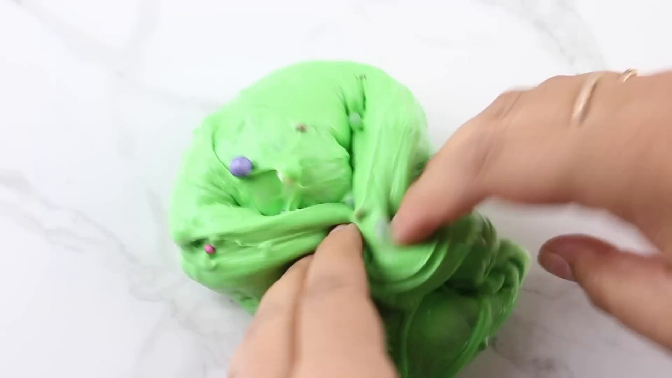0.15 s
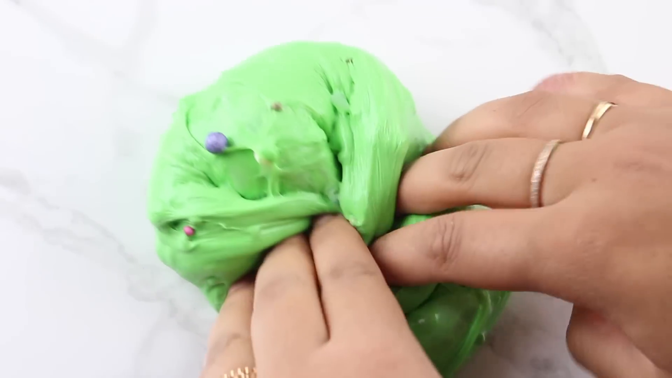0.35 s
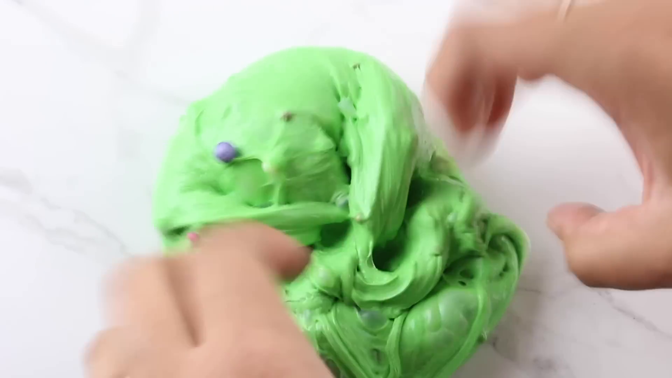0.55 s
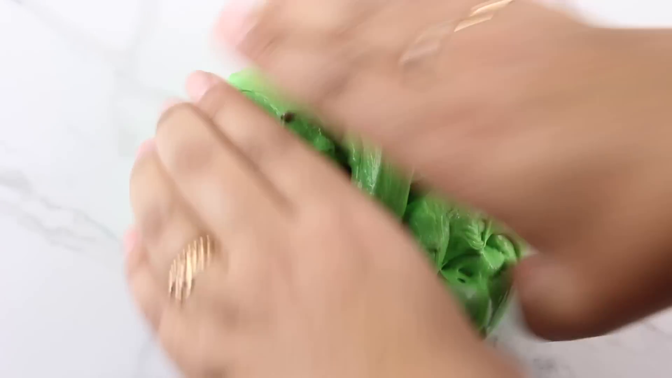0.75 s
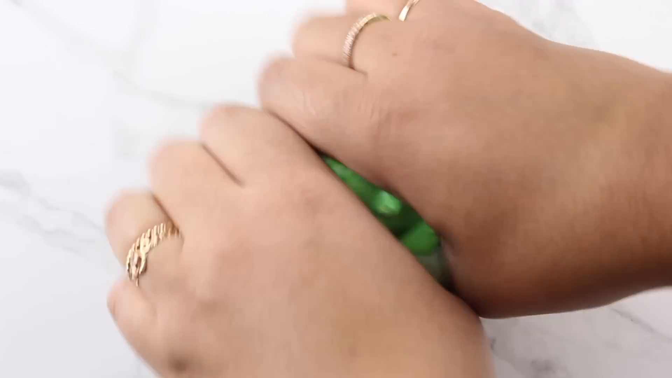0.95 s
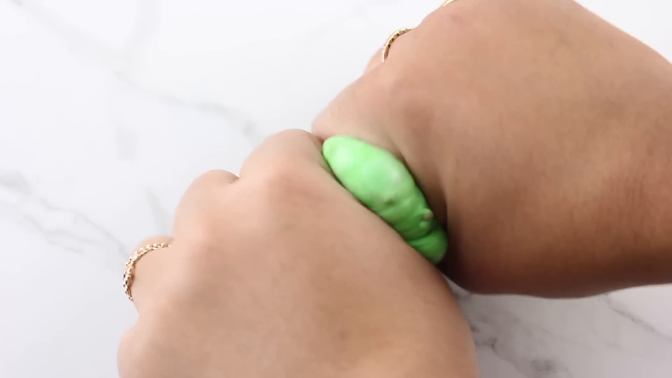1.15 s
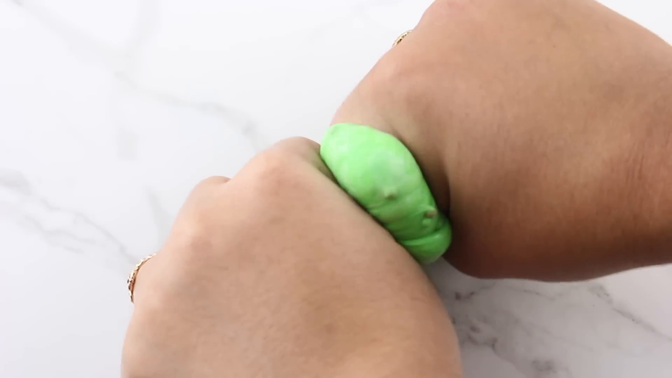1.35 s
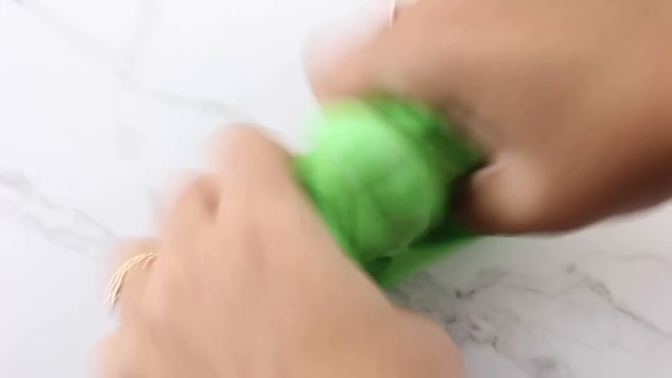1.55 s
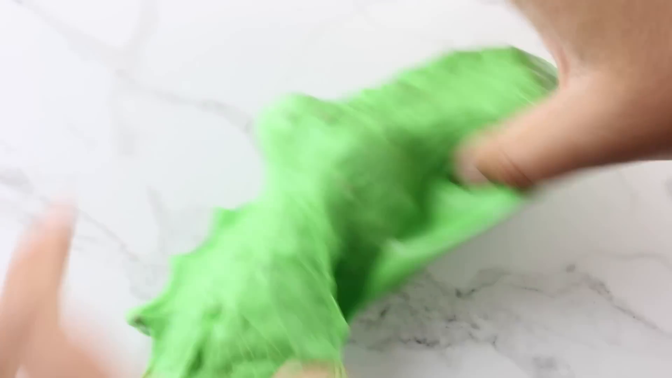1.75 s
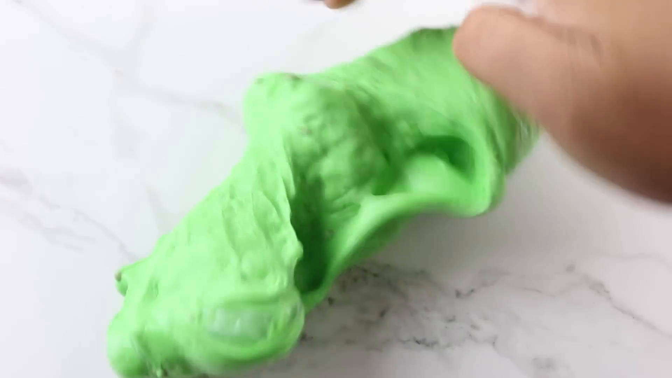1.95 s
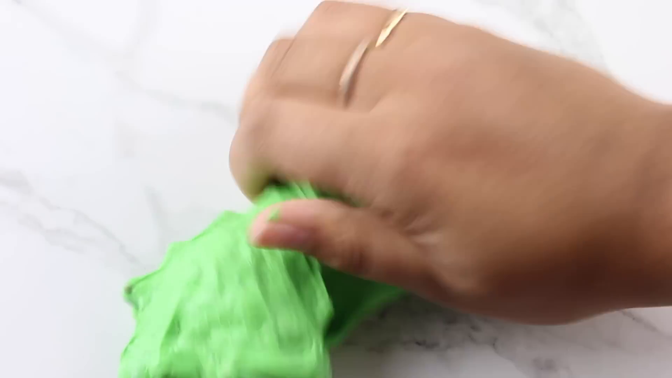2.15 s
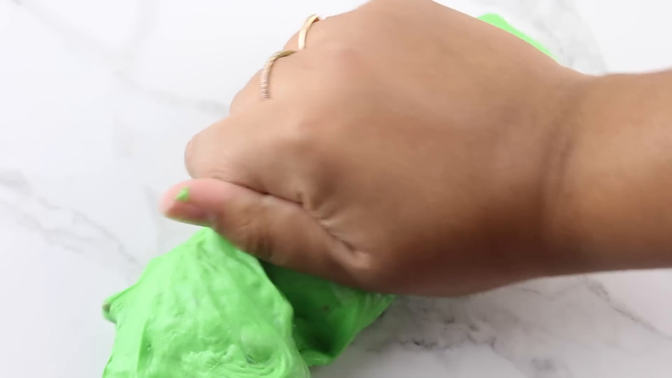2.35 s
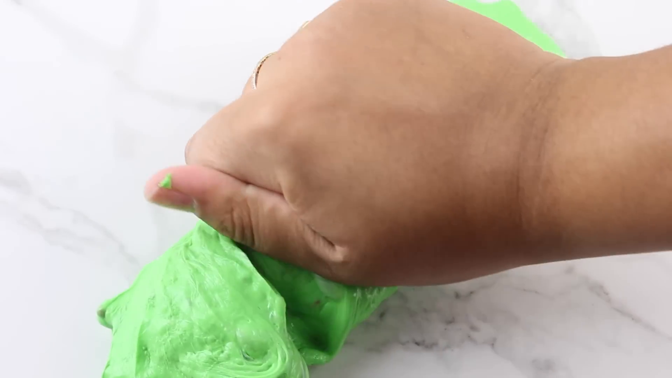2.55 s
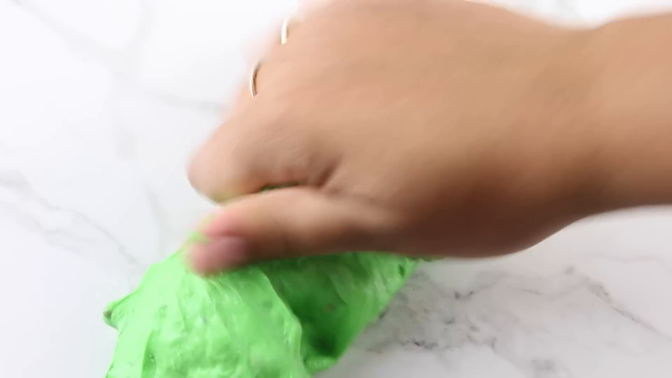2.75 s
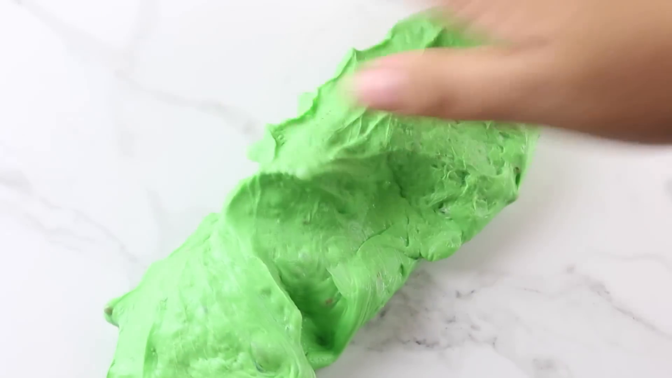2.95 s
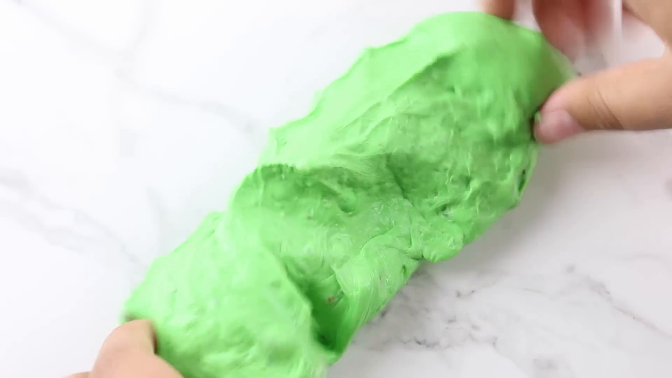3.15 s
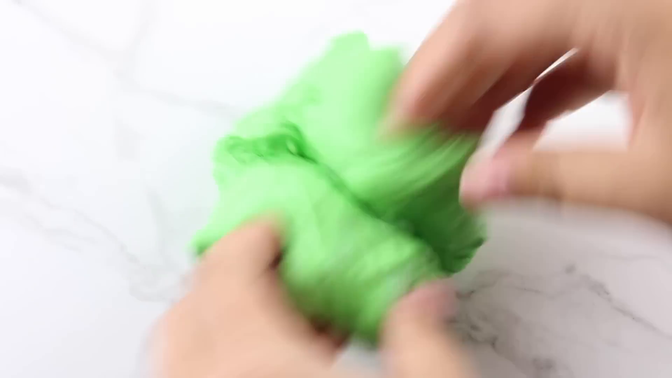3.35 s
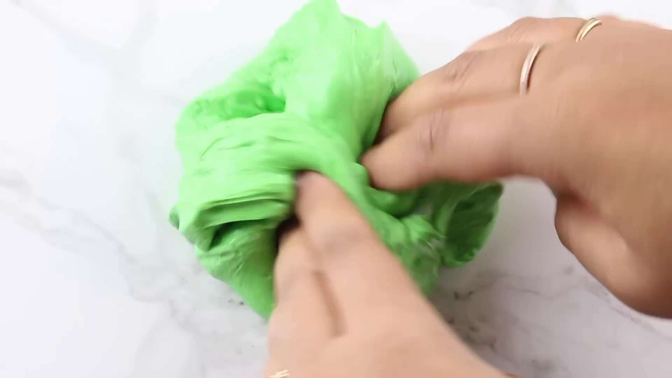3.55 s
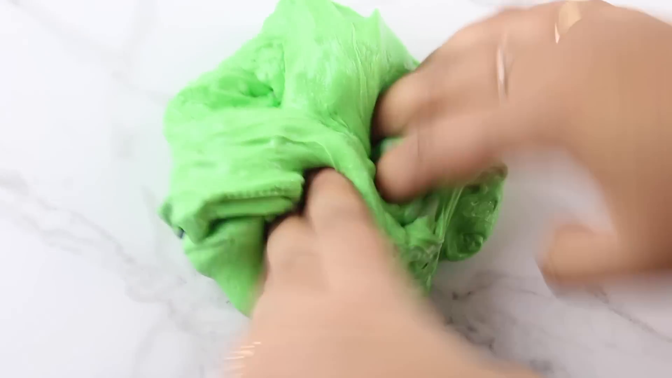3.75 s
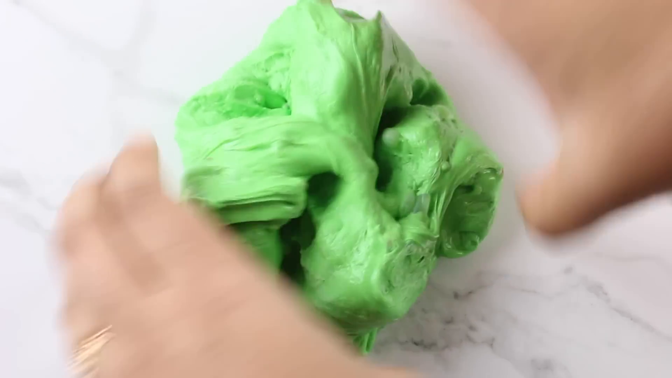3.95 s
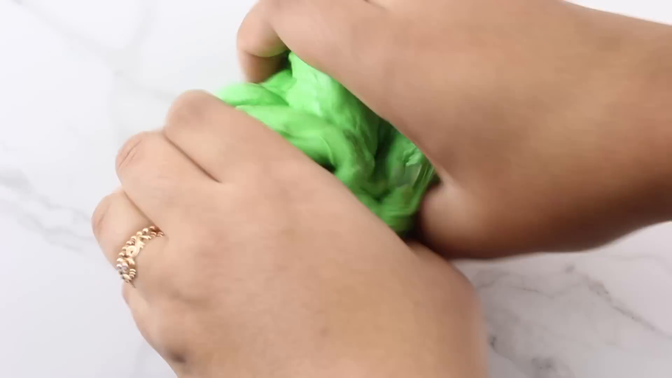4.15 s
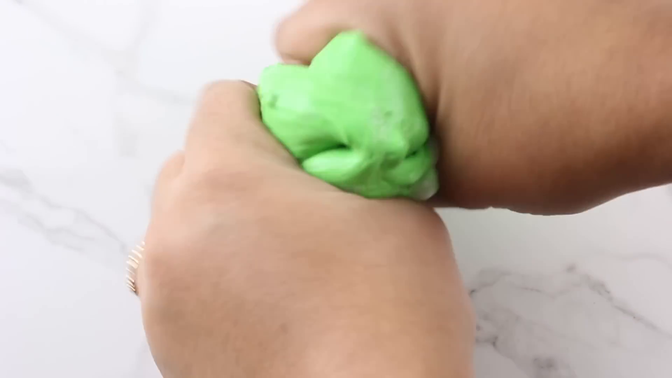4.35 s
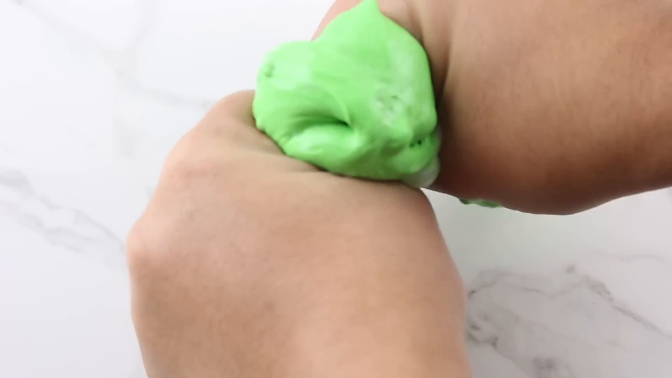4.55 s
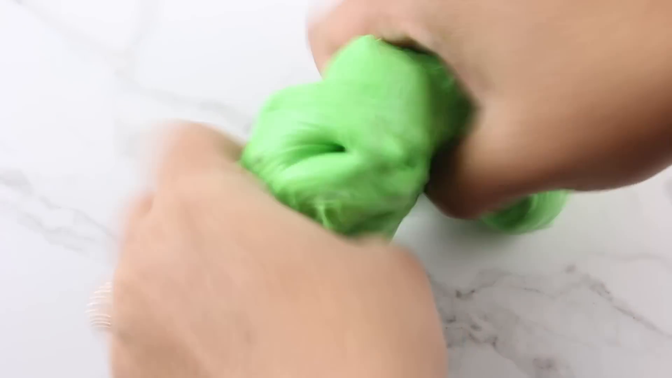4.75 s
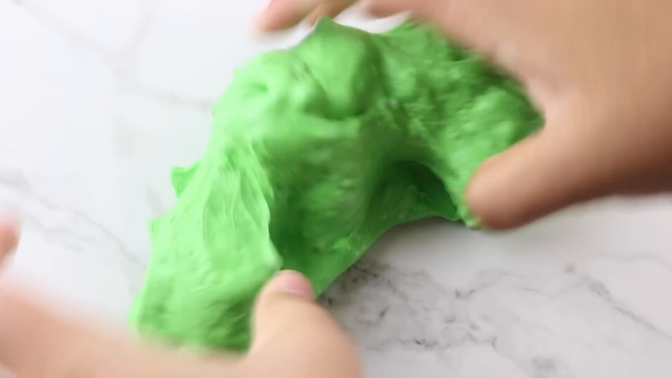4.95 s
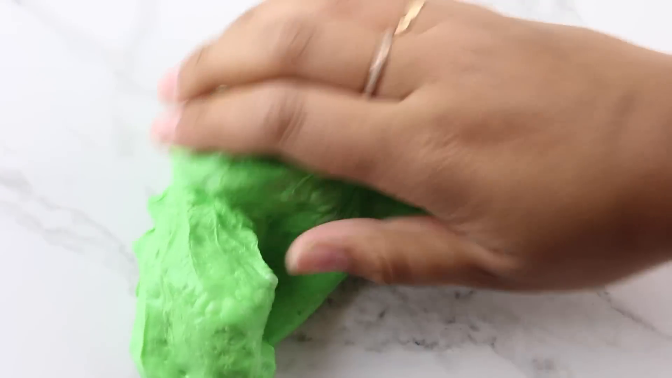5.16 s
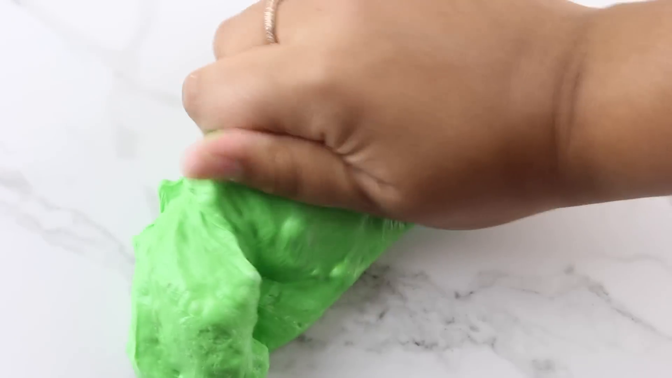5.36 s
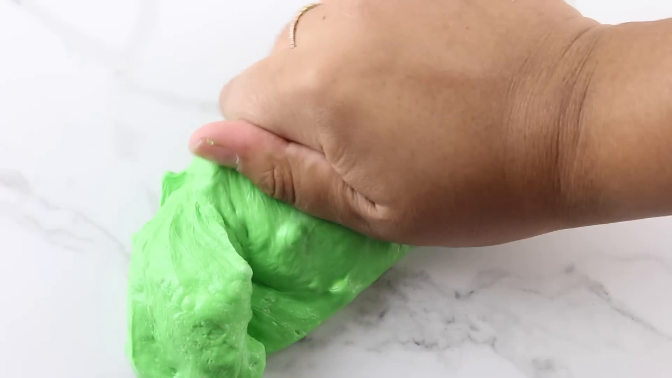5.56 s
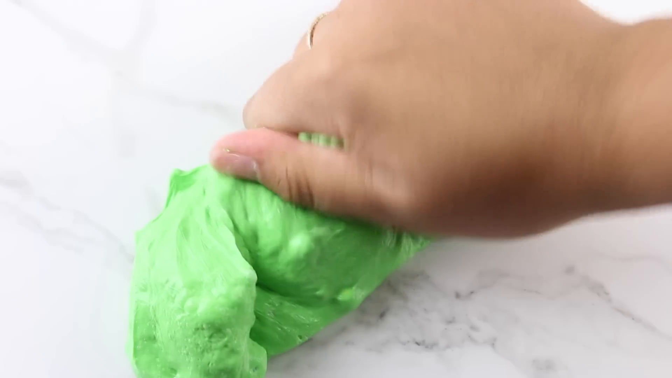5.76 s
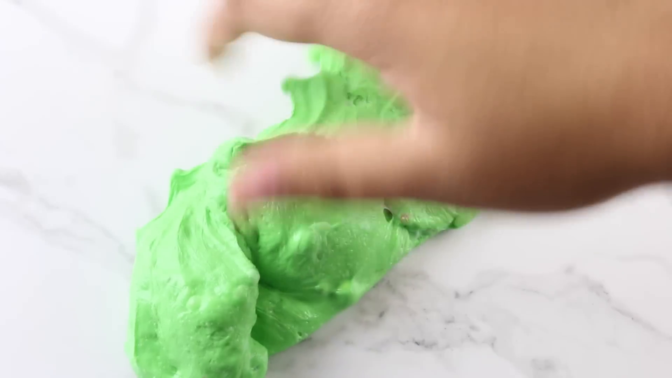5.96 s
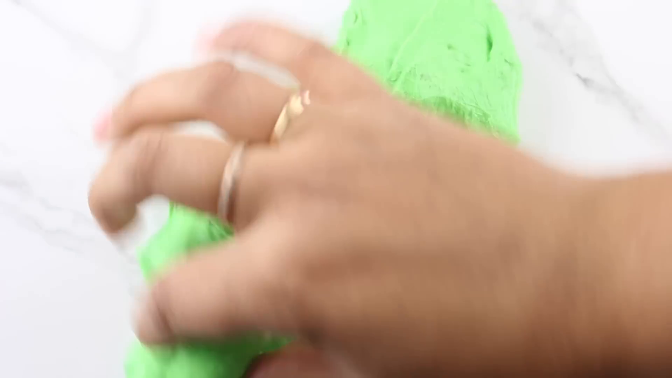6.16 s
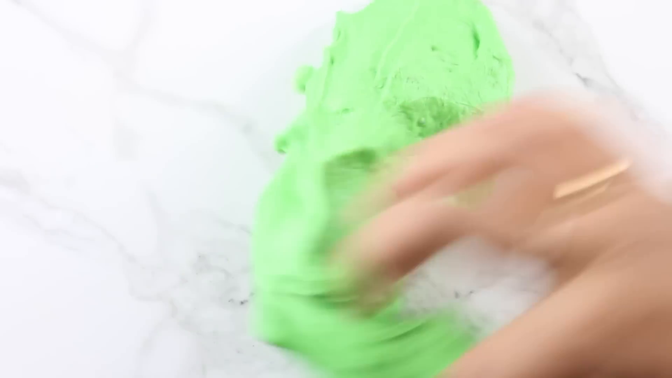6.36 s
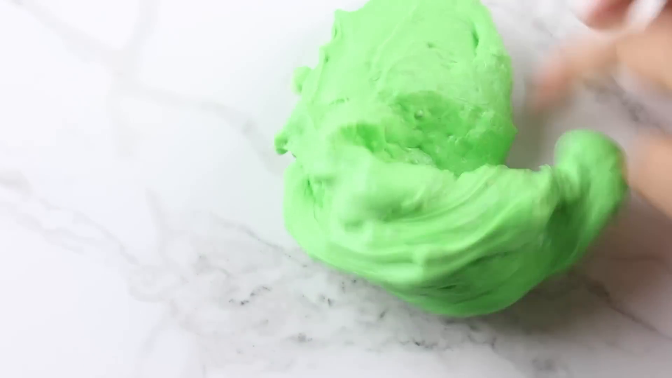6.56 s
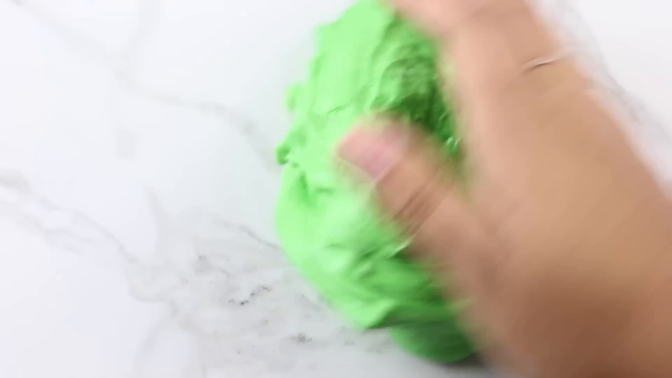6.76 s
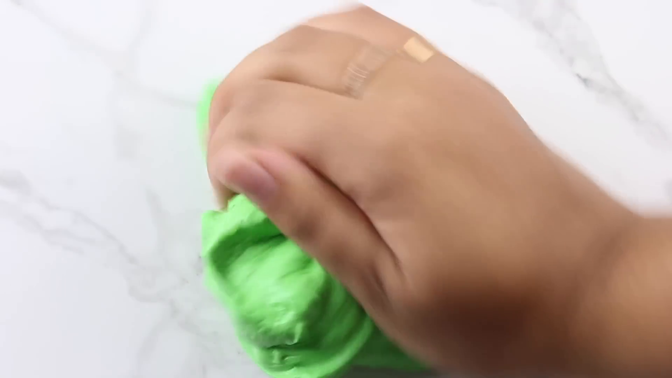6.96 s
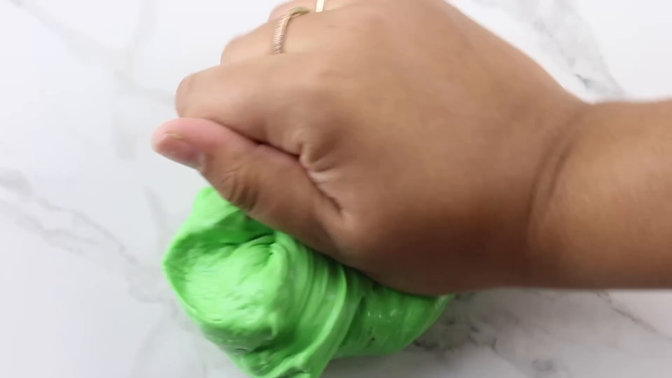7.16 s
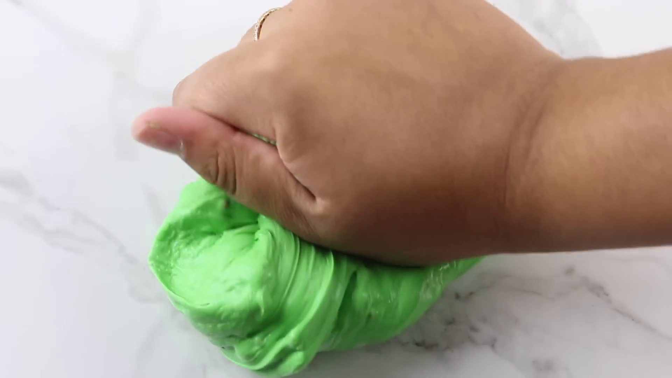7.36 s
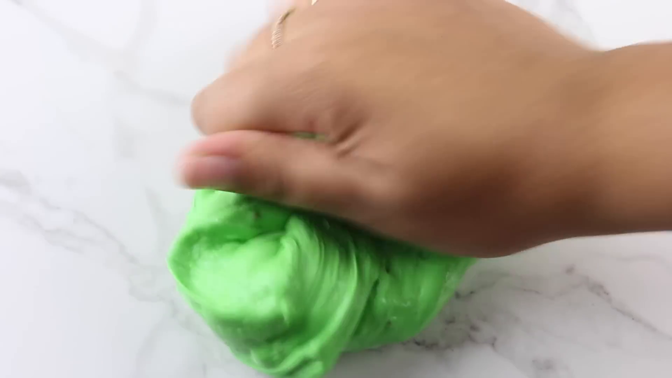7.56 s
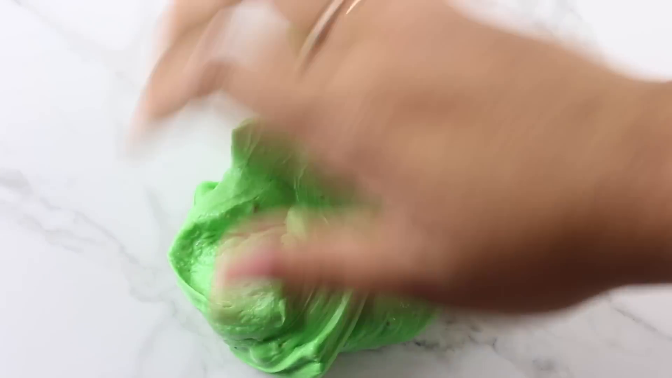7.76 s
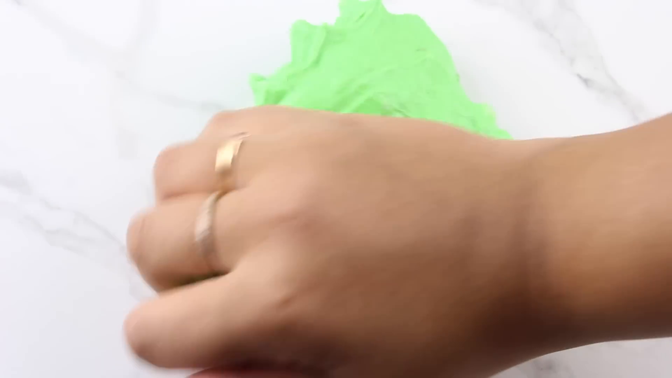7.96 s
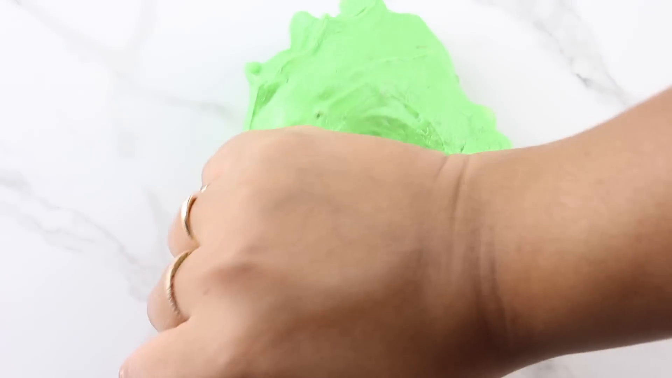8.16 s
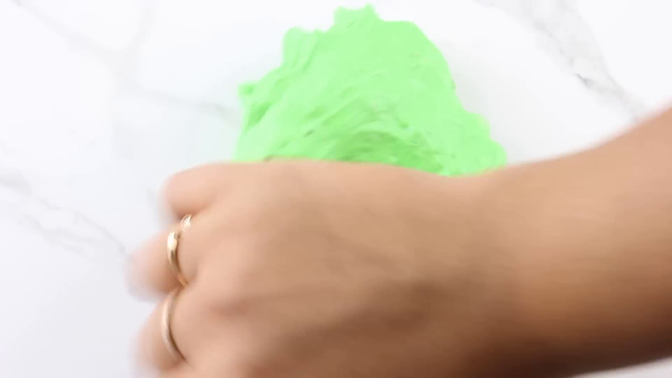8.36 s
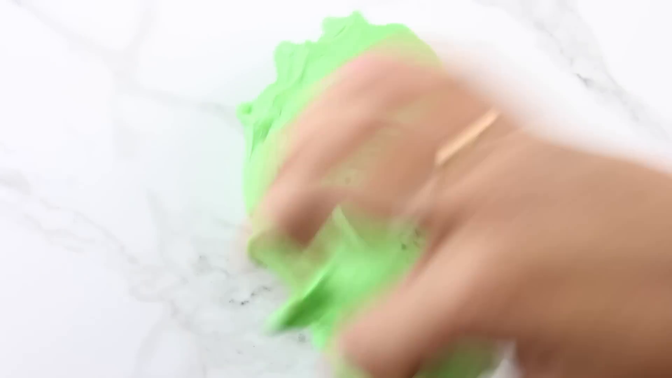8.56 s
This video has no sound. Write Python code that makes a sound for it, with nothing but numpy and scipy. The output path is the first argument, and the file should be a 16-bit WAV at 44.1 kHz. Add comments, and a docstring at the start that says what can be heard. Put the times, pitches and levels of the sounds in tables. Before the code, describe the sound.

Close, dry and bright: sticky slime is pressed until trapped bubbles snap in fast irregular clusters, some almost painfully loud. Each cluster ends in fine wet crackle, then hands lift with a fizzy peel and low squish. Calmer folding brings small ticks, plops and dull thuds on stone. The loudest volleys come early and mid-way, with lesser ones near the end, in a small quiet room.

```python
"""Air pockets trapped in a lump of sticky slime burst in sharp pops, each a skin snap and a briefly ringing cavity;
the biggest overload the recorder. Two hands fold and squeeze the lump on a stone counter, close to a microphone:
swarms of tiny cavities crackle and squish, deep folds plop, an unsteady sine squeaks out of a fold, and
low noise bursts bump the counter softly. A small quiet room adds dense echoes and filtered-noise room tone."""
import sys
import numpy as np
from scipy import signal
from scipy.io import wavfile
from scipy.ndimage import uniform_filter1d

SR = 44100
rng = np.random.default_rng(int(sys.argv[2]) if len(sys.argv) > 2 else 0)


def output_pcm(signal):
    """Save a mono or channel-first signal as 16-bit PCM at the path in sys.argv[1].

    Samples are clipped to [-1, 1] before scaling.
    """
    pcm = np.clip(np.atleast_2d(signal).T, -1, 1) * 32767
    wavfile.write(sys.argv[1], SR, np.round(pcm).astype(np.int16))


N = 379701
TIME = np.arange(N) / SR

# the air pockets that burst loudest, levels ahead of colouring and overload:
# (time [s], level [dB], cavity pitch [Hz], cavity Q [-])
AIR_POCKETS = [(0.13, -40, 4000, 2.5), (0.1703, -38, 6600, 0.72), (0.1984, -43.5, 8980, 1.6),
               (0.2365, -35, 7500, 0.6), (0.324, -33, 8000, 1.6), (0.3944, -27, 7260, 5),
               (0.4, -22.5, 3900, 1.5), (0.6053, -27.5, 3420, 0.6), (0.613, -32, 4480, 0.54),
               (0.948, -34, 3350, 1.8), (0.954, -31, 11000, 0.77), (1.0364, -29, 4230, 3),
               (1.0419, -18.5, 3800, 1.8), (1.0891, -15, 2800, 2.3), (1.1072, -8.5, 3700, 0.88),
               (1.1105, -11.5, 3900, 3), (1.1157, -3, 3040, 3.2), (1.1513, -12, 2660, 1.5),
               (1.19, -26, 3530, 0.56), (1.2467, -28, 3570, 0.43), (1.3, -9, 4400, 1.3),
               (1.3437, -23, 4800, 0.39), (1.3743, -13.5, 3760, 3.2), (1.3795, -2.5, 8800, 1.4),
               (1.383, -8.5, 8600, 2.6), (1.421, 0.5, 5930, 0.56), (1.428, -7, 12900, 4),
               (1.471, -24, 4200, 1.3), (2.252, -39, 3550, 0.85), (2.3311, -28, 3220, 3),
               (2.3626, -33, 3350, 2), (2.405, -29, 3700, 0.74), (2.464, -26, 12000, 1.2),
               (2.4897, -27, 7000, 1.2), (2.5228, 1, 5300, 2.6), (2.5256, -12, 5660, 3.4),
               (2.5527, -11, 3740, 0.96), (2.561, 1.5, 3830, 1.08), (2.575, -8.5, 11000, 1.6),
               (2.5884, -4.5, 1740, 1.1), (2.6083, -3.5, 3055, 1.2), (2.6637, -7, 9100, 1.25),
               (2.6819, -8.5, 3030, 1.25), (2.7246, -21.5, 11000, 1.1), (2.8898, -31.5, 5000, 1),
               (3.1353, -44, 1600, 1.7), (3.332, -42.5, 6500, 0.8), (3.4271, -35.5, 5540, 0.42),
               (3.4573, -35.5, 3180, 3), (3.504, -29, 6500, 1.8), (3.554, -22.5, 3630, 2.1),
               (3.6081, -28.5, 6440, 0.6), (3.691, -25.5, 2850, 0.94), (3.7276, -15, 3920, 2.8),
               (3.9218, -29.5, 2220, 0.56), (4.2568, -37, 3760, 1.5), (4.2727, -32.5, 8980, 2.2),
               (4.2964, -32.5, 4500, 1.2), (4.328, -31, 3000, 1), (4.396, -35, 7950, 0.7),
               (4.4089, -21.5, 1820, 0.65), (4.4229, -23.5, 7550, 2.2), (4.5293, -28, 7700, 1.4),
               (4.5338, -13, 7900, 1.4), (4.5907, 5, 6100, 1.83), (4.5976, -2, 6520, 4.6),
               (4.604, -6.5, 5630, 4.3), (4.6614, -7, 10300, 2.6), (4.6729, -4.5, 8600, 3.1),
               (5.3688, -31, 3900, 1.2), (5.3934, -31, 3760, 0.86), (5.4308, -18.5, 4000, 1.1),
               (5.5339, -21.5, 6200, 0.53), (5.5524, -26.5, 7460, 0.9), (5.5789, -10.5, 4000, 2.8),
               (5.6027, -22, 9700, 3), (5.6968, -22.5, 4800, 0.42), (5.7506, -23, 5700, 0.59),
               (5.7945, -34.5, 7100, 1.5), (5.8636, -27.5, 3160, 1.9), (6.2345, -31, 4820, 0.65),
               (6.5478, -35.5, 1570, 0.87), (6.5619, -39.5, 7500, 0.56), (6.632, -41, 2680, 1),
               (6.9219, -34.5, 2110, 0.49), (6.9952, -29, 4840, 0.92), (7.027, -33.5, 3380, 2),
               (7.0938, -37, 3990, 2.6), (7.1466, -33, 11500, 2.6), (7.25, -41, 3630, 5),
               (7.2677, -35, 6800, 2), (7.3281, -26, 6720, 1), (7.344, -16.5, 5430, 5.6),
               (7.4042, -9, 4100, 0.99), (7.419, -9, 3070, 0.9), (7.4722, -7, 2800, 2.8),
               (7.475, -9, 9500, 1.4), (7.9791, -35, 3460, 2.1), (8.0907, -39, 5000, 0.84),
               (8.135, -25, 4850, 1.2), (8.149, -24.5, 2510, 2.5), (8.1574, -18.5, 3250, 1.4),
               (8.1757, -16.5, 4480, 1.3), (8.2088, -11, 4400, 2.2), (8.2318, -8.5, 6360, 3),
               (8.2588, -25, 5030, 1.9), (8.2888, -13.5, 9150, 1.3), (8.367, -33.5, 3970, 1.5),
               (8.4157, -29, 3200, 1.2), (8.453, -31, 3500, 0.9)]
FOLD_Q = 3.5  # resonance of a wet fold


def gain_of(db):
    """Decibels to amplitude."""
    return 10 ** (np.asarray(db) / 20)


def evened(x):
    """Scales to rms 1."""
    return x / np.sqrt(np.mean(x ** 2) + 1e-20)


def unit(x):
    """Scales to energy 1."""
    return x / (np.linalg.norm(x) + 1e-20)


def read(points, hz):
    """Reads a table on a log-frequency axis."""
    f, value = np.transpose(points)
    return np.interp(np.log(hz + 1), np.log(f + 1), value)


def add(mix, s, sound):
    """Mixes a sound in at time s."""
    part = mix[max(round(s * SR), 0):][:len(sound)]
    part += sound[:len(part)]


def colour(x, points, size=2048):
    """Minimum-phase filter, so that clicks keep their sharp front."""
    hz = abs(np.fft.fftfreq(size, 1 / SR))
    log_gain = np.log(gain_of(read(points, hz)))
    spectrum = np.exp(np.conj(signal.hilbert(log_gain)))
    taps = np.fft.ifft(spectrum).real
    return signal.oaconvolve(x, taps)[:len(x)]


def high_pass(x, hz):
    """Gentle bass cut."""
    return signal.lfilter(*signal.butter(1, hz, "high", fs=SR), x)


def cavity(t, hz, q):
    """A small pocket of air rings for a few cycles when it opens."""
    decay = np.exp(-np.pi * hz * t / max(q, .5))
    return unit(decay * np.sin(2 * np.pi * min(hz, SR / 3) * t))


def scatter(t, echo_db, fade_s, per_s=5000, delay_s=.0004):
    """The direct sound, then quick echoes off hands and counter; new for each spot in the lump."""
    side, chance = rng.random((2, len(t)))
    echoes = np.sign(side - .5) * (chance < per_s / SR) * np.exp(-t / fade_s) * (t > delay_s)
    taps = gain_of(echo_db) * unit(echoes)
    taps[0] = 1  # direct sound
    return unit(taps)


def pops(size=1100, span_s=0.0035, big_db=-19.01105, small_echo_db=-1,
         tearing_db=10 / 3.5, big_send_db=2 / 3.5, bass_hz=750):
    """Each pocket snaps open and its cavity rings; returns the close sound and the sound sent into the room."""
    # tone of counter and microphone: (frequency [Hz], gain [dB])
    counter_tone = [(60, -13), (150, -10.5), (300, -2.5), (600, -4), (1100, -2.5), (1600, 0), (2600, 0.5),
                    (4000, 1.5), (7000, 2), (11000, 4), (15500, 1)]
    # snap of the tearing skin against a 4 kHz cavity; smaller, higher pockets snap more
    snap_db, snap_db_per_octave = -20, 5
    near, sent, t = np.zeros(N), np.zeros(N), np.arange(size) / SR
    snap = unit(high_pass(signal.unit_impulse(size), 5400))
    for s, db, hz, q in AIR_POCKETS:
        octaves = np.log2(hz / 4000)
        snap_gain = gain_of(snap_db + snap_db_per_octave * octaves)
        burst = high_pass(cavity(t, hz, q) + snap_gain * snap, bass_hz)
        # bigness runs from 0 to 1; big pockets tear on for a few milliseconds
        big = 1 / (1 + np.exp((big_db - db) / 4))
        echoes = scatter(t, echo_db=small_echo_db + tearing_db * big, fade_s=.0042)
        sound = signal.fftconvolve(burst, echoes)[:size]
        strength = gain_of(db) * np.sqrt(span_s * SR)
        add(near, s, strength * unit(sound))
        add(sent, s, strength * gain_of(big_send_db * big) * unit(burst))
    return colour(near, counter_tone), colour(sent, counter_tone)


def wash():
    """Each burst is followed by a grainy echo-like wash that fades quickly; gives its strength over time."""
    start_db, fade_db_per_s = -33, 139.5  # start against the pop, ahead of the fizz and tick gains
    power, t = np.zeros(N), np.arange(SR // 2) / SR
    fading = gain_of(start_db - fade_db_per_s * t)
    for s, db, _, _ in AIR_POCKETS:
        add(power, s, (gain_of(db) * fading) ** 2)
    return np.sqrt(power)


def stroke(start, end, rise_s, release_s):
    """Envelope of one hand movement: builds up to start, holds until end, dies away."""
    range_db = 31  # fall over one rise or release time
    bend = 1.29  # above 1: rounder top, quicker end
    outside = np.maximum((start - TIME) / rise_s, 0) + np.maximum((TIME - end) / release_s, 0)
    return gain_of(-range_db * np.minimum(outside, 4) ** bend)


def efforts():
    """Strength over time of the pressing, the peeling and the folding that goes with both."""
    # Crackle levels here stand ahead of the fizz and tick gains.
    # fingers pressing into the lump, the growth spread evenly around mid-squeeze:
    # (start [s], end [s], crackle level [dB], squish level [dB], crackle growth [dB])
    squeezes = [(0.256, 0.424, -59.5, -63, -1), (0.92, 1.464, -42, -50, 3), (2.294, 2.786, -42.5, -62, 3.5),
                (3.499, 3.764, -48.5, -58.5, -2), (4.287, 4.45, -38, -49.5, -3.5),
                (5.387, 5.747, -47, -53.5, -13), (6.921, 7.042, -46, -59, -3.5),
                (7.26, 7.5, -43.5, -64.5, 3.5), (8.081, 8.46, -44.5, -67.5, -3)]
    # a hand lifts off or shifts the lump, and the slime peels from skin and stone:
    # (peak time [s], length [s], crackle level [dB], squish level [dB])
    peels = [(0.0, 0.15, -37, -53), (0.589, 0.087, -44, -41.5), (1.636, 0.15, -33, -43),
             (1.983, 0.081, -54.5, -68), (2.861, 0.13, -39.5, -52), (3.15, 0.057, -54.5, -45.5),
             (3.26, 0.3, -54, -65), (3.9, 0.13, -39, -47.5), (4.12, 0.11, -62.5, -58),
             (4.843, 0.2, -37.5, -48.5), (5.902, 0.16, -36.5, -46.5), (6.358, 0.3, -46.5, -58),
             (6.541, 0.11, -46.5, -54), (6.682, 0.056, -62, -58), (7.644, 0.15, -34.5, -44),
             (8.505, 0.16, -40.5, -53)]
    close_s, slacken_s = 0.1, 0.12  # the grip builds up and dies away over these times
    peel_rise = 0.52  # build-up time as a share of the peel's length
    rest_crackle_db, rest_squish_db = -77, -77  # the lump settling by itself
    press = np.zeros(N)
    peel = np.full(N, gain_of(rest_crackle_db))
    fold = np.full(N, gain_of(rest_squish_db))
    for start, end, crackle_db, squish_db, growth_db in squeezes:
        grip = stroke(start, end, close_s, slacken_s)
        growth = growth_db * np.interp(TIME, [start, end], [-.5, .5])
        press += grip * gain_of(crackle_db + growth)
        fold += grip * gain_of(squish_db)
    for s, length, crackle_db, squish_db in peels:
        pull = stroke(s, s, peel_rise * length, length)
        peel += pull * gain_of(crackle_db)
        fold += pull * gain_of(squish_db)
    return press, peel, fold


def grains(per_s, spread_db, low_hz, high_hz, q, echo_db, count=24, size=500):
    """Countless tiny cavities of many pitches open at random; a few are much larger than the rest."""
    chance, bigness = rng.random(N), rng.exponential(1, N)
    which = rng.integers(0, count, N)  # pitch of each grain
    sizes = gain_of(spread_db * np.minimum(bigness, 3.3))
    clicks = (chance < per_s / SR) * sizes * rng.choice([-1, 1], N)
    out, t = np.zeros(N), np.arange(size) / SR
    for k, hz in enumerate(np.geomspace(low_hz, high_hz, count)):
        bubble = high_pass(cavity(t, hz, q), hz / 2)
        ring = signal.fftconvolve(bubble, scatter(t, echo_db=echo_db, fade_s=0.0027))[:size]
        out += np.sqrt(hz) * signal.oaconvolve(clicks * (which == k), unit(ring))[:N]
    return out


def kneading(grip_fizz_db=-8, grip_ticks_db=-2.5, peel_fizz_db=-2.5, peel_ticks_db=-7, clump_db=2.5, size=500):
    """Under the grip single small bubbles tick; on letting go sticky threads fizz; wet folds squish lower down."""
    # tone of fizz and ticks: (frequency [Hz], filter gain [dB])
    crackle_tone = [(200, -17.5), (600, -2.5), (1500, 0.5), (3500, 2.5), (6000, -4.5), (10000, -8),
                    (15500, -11.5)]
    # tone of the wet folds: (frequency [Hz], filter gain [dB])
    squish_tone = [(60, -10.5), (150, -7), (330, 0), (650, -2.5), (1200, -5.5), (2500, -23), (6000, -41.5)]
    press, peel, fold = efforts()
    press_and_wash = np.hypot(press, wash())  # the wash after the pops shares the grip's grains
    # threads let go in bunches
    clumps = gain_of(clump_db * evened(uniform_filter1d(rng.standard_normal(N), size)))
    threads = grains(per_s=1800, spread_db=4.0, low_hz=880, high_hz=13800, q=3.5, echo_db=1.0)
    bubbles = grains(per_s=190, spread_db=4.0, low_hz=1330, high_hz=14500, q=3.2, echo_db=-2.0, count=16)
    folds = grains(per_s=590, spread_db=2.4, low_hz=185.2, high_hz=1550, q=FOLD_Q, echo_db=-2.5, count=16)
    fizz = evened(clumps * colour(threads, crackle_tone))
    ticks = evened(colour(bubbles, crackle_tone))
    squish = evened(colour(folds, squish_tone))
    fizz *= press_and_wash * gain_of(grip_fizz_db) + peel * gain_of(peel_fizz_db)
    ticks *= press_and_wash * gain_of(grip_ticks_db) + peel * gain_of(peel_ticks_db)
    return fizz + ticks + squish * fold


def plops(span_s=0.013, size=2600):
    """Deep folds close with a wet plop; they hold more air, so they ring lower and longer."""
    # deep folds closing: (time [s], level [dB], pitch [Hz])
    closing_folds = [(0.606, -38.5, 930), (1.629, -43.5, 730), (1.639, -38.5, 656), (2.329, -39, 358),
                     (2.828, -39, 630), (3.16, -53, 388), (3.889, -43.5, 318), (3.892, -42, 550),
                     (3.92, -36, 560), (5.692, -34.5, 343), (6.233, -40, 554), (7.671, -40.5, 865),
                     (8.08, -45, 343), (8.107, -47.5, 382)]
    out, t = np.zeros(N), np.arange(size) / SR
    for s, db, hz in closing_folds:
        fold = high_pass(cavity(t, hz, FOLD_Q), hz / 2)
        ring = signal.fftconvolve(fold, scatter(t, echo_db=-3.0, fade_s=0.0046))[:size]
        add(out, s, gain_of(db) * np.sqrt(span_s * SR) * unit(ring))
    return out


def squeaks(waver=0.011):
    """Squeezed air makes the lip of a pinhole flutter in an unsteady whistle."""
    # air escaping through a pinhole, one list a squeak: (time [s], pitch [Hz], level [dB])
    pinholes = [
        [(0.254, 2920, -51), (0.258, 3130, -46), (0.262, 3560, -40), (0.265, 5320, -39), (0.275, 5230, -50),
         (0.281, 5200, -40), (0.291, 4960, -46), (0.298, 4650, -37), (0.302, 5170, -57), (0.311, 4700, -60)],
        [(7.196, 2180, -53), (7.202, 2280, -47), (7.211, 2810, -51), (7.216, 2880, -66)],
    ]
    out = np.zeros(N)
    for rows in pinholes:
        s, hz, db = np.transpose(rows)
        t = np.arange(s[0], s[-1], 1 / SR)
        drift = evened(uniform_filter1d(rng.standard_normal(SR), size=90))[:len(t)]
        pitch = np.interp(t, s, hz) * (1 + waver * drift)
        turns = np.cumsum(pitch) / SR
        level = gain_of(np.interp(t, s, db)) * np.sqrt(2)  # rms to peak
        add(out, s[0], level * np.sin(2 * np.pi * turns))
    return out


def bumps(rise_s=0.003, length_s=0.03):
    """A soft mass meets stone: a dull low push of band-passed noise with no ring."""
    # hands and lump landing on the counter: (time [s], level [dB], pitch near the top of the band [Hz])
    landings = [(0.58, -47.5, 276), (0.625, -54.5, 140), (0.772, -53, 119), (1.141, -44.5, 156.8),
                (2.32, -51, 177), (3.13, -48.5, 129), (3.885, -54, 147.4), (3.925, -55, 147.8),
                (4.115, -46, 114), (5.685, -49, 310), (7.64, -55, 150.4), (7.98, -49, 116),
                (7.996, -48, 287)]
    out, t = np.zeros(N), np.arange(SR // 4) / SR
    envelope = (1 - np.exp(-t / rise_s)) * np.exp(-(t / length_s) ** 2)
    for s, db, hz in landings:
        band = signal.butter(2, [hz * 0.67, hz * 1.1], "band", fs=SR, output="sos")
        push = signal.sosfilt(band, rng.standard_normal(len(t)) * envelope)
        add(out, s - .006, gain_of(db) * np.sqrt(length_s * SR) * unit(push))  # starts 6 ms early
    return out


def room(x, wet_db, delay_s, size=256):
    """Dense wall echoes: sparse random taps, each frequency dying at its own rate, the top treble fastest."""
    # time to fall by 60 dB: (frequency [Hz], decay time [s])
    decay_times = [(200, 0.41), (600, 0.3), (1500, 0.5038), (3700, 0.2467), (8000, 0.355), (15000, 0.11)]
    # tone of the echoes at their start: (frequency [Hz], gain [dB])
    wall_tone = [(100, -1.5), (300, -1), (900, 2.5), (1600, -4.5), (3500, 4), (8000, -2), (15000, 4.5)]
    t = np.arange(SR // 2) / SR
    taps = rng.standard_normal(len(t)) * (rng.random(len(t)) < .2) * (t > delay_s)
    hz, frame_s, z = signal.stft(taps, SR, nperseg=size)
    fall_db = 60 * frame_s / read(decay_times, hz)[:, None]
    fade_db = read(wall_tone, hz)[:, None] - fall_db
    tail = signal.istft(z * gain_of(fade_db), SR, nperseg=size)[1]
    return gain_of(wet_db) * signal.oaconvolve(x, unit(tail))[:N]


def room_tone(level_db=-62):
    """Faint steady rumble and hiss from filtered noise."""
    # tone of the quiet room: (frequency [Hz], filter gain [dB])
    quiet_tone = [(15, -45), (25, -18), (64, -11.5), (82, -18.5), (134, -4), (175, -10), (223, -11.5),
                  (277, -6.5), (317, -14), (394, -23.5), (10100, -35.5), (11000, -33.5), (14800, -34),
                  (16000, -41.5)]
    return gain_of(level_db) * evened(colour(rng.standard_normal(N), quiet_tone))


def scene():
    """The slime close up, the room behind it."""
    popping, sent = pops()
    handling = kneading() + plops() + bumps() + squeaks()
    walls = room(sent + gain_of(1.5) * handling, wet_db=-12.0, delay_s=0.007)
    return (popping + handling + walls + room_tone())[None]


def record(dry, ceiling=1.0, knee=5, edge_hz=16000):
    """The loudest pops overload the recorder in a soft clip; then the band limit."""
    clipped = dry / (1 + abs(dry / ceiling) ** knee) ** (1 / knee)
    band_limit = signal.firwin(401, edge_hz, window=("kaiser", 8), fs=SR)
    return signal.oaconvolve(clipped, band_limit[None], "same")


dry = scene()
out = record(dry)
output_pcm(out)
```